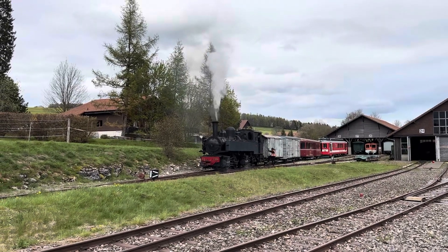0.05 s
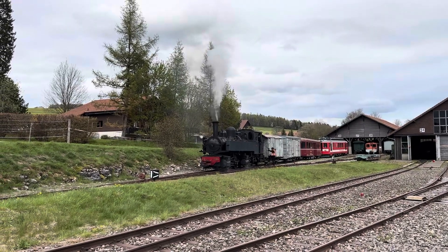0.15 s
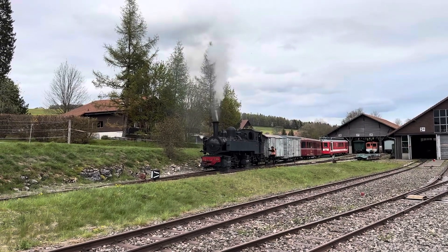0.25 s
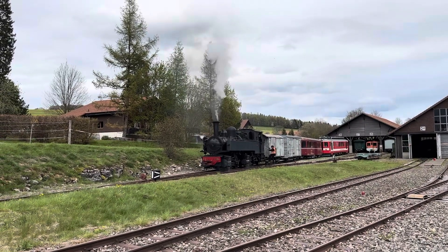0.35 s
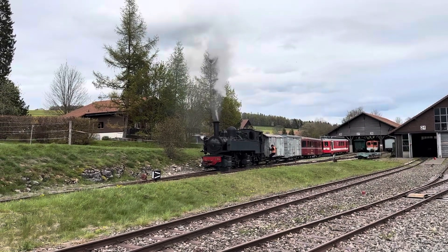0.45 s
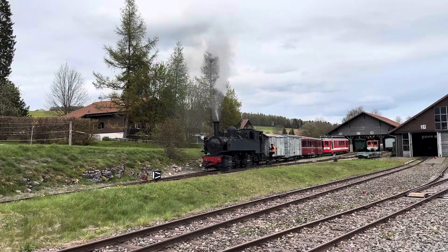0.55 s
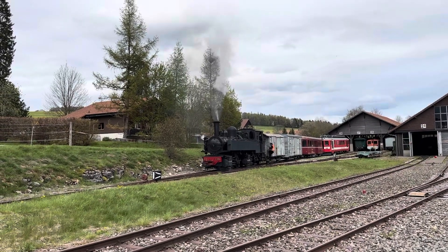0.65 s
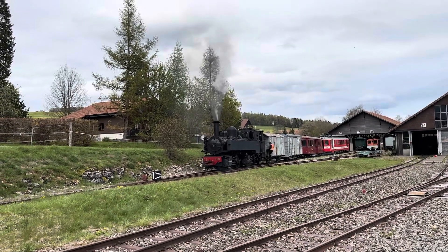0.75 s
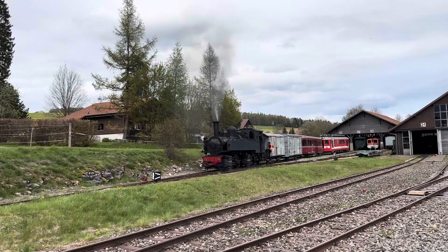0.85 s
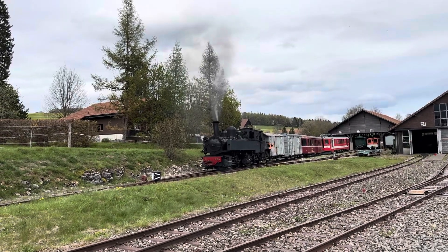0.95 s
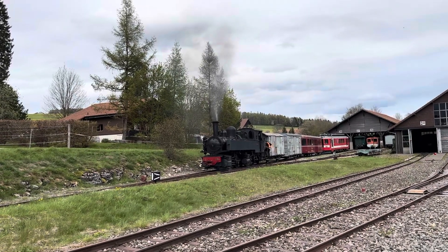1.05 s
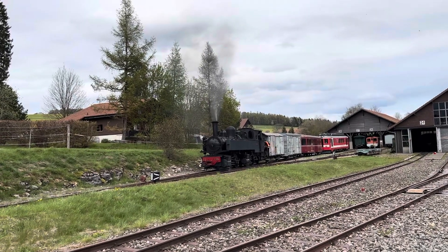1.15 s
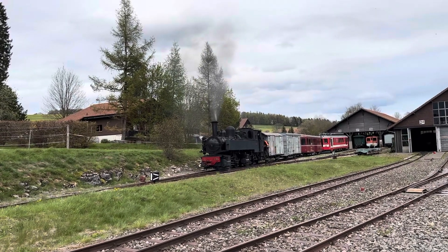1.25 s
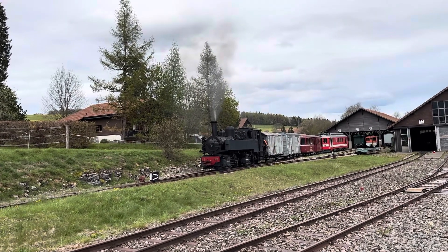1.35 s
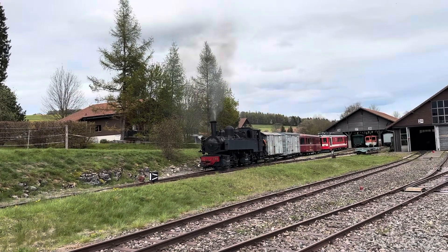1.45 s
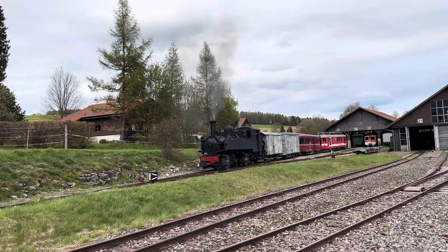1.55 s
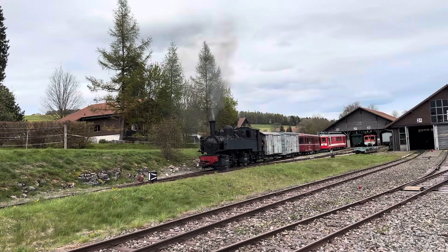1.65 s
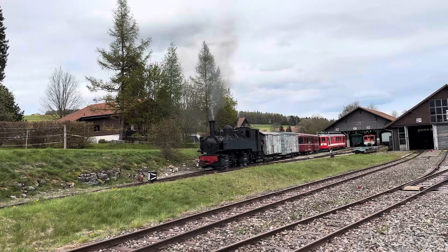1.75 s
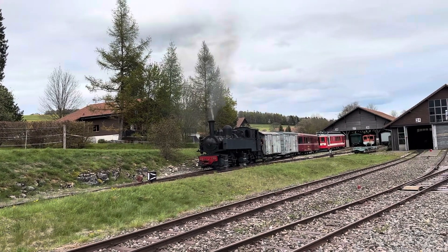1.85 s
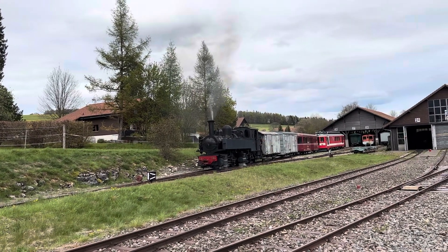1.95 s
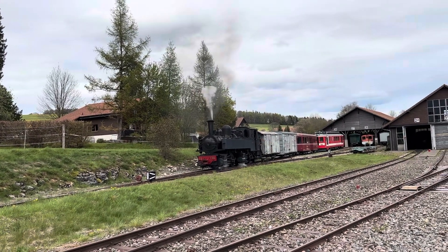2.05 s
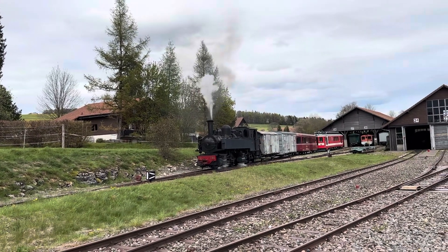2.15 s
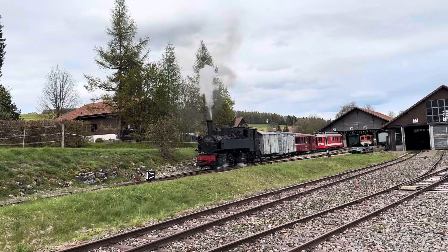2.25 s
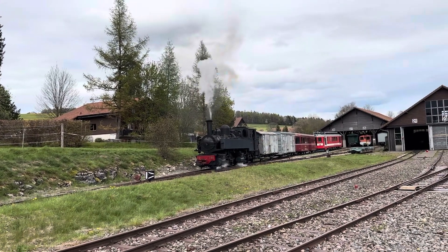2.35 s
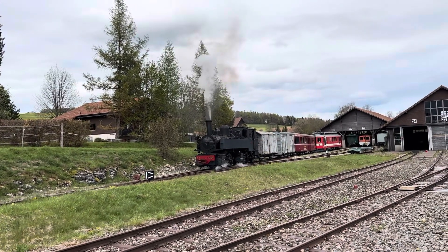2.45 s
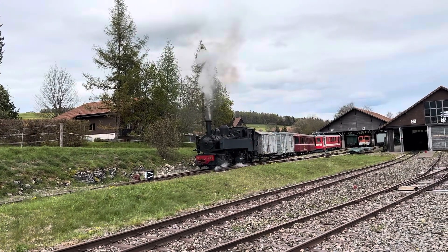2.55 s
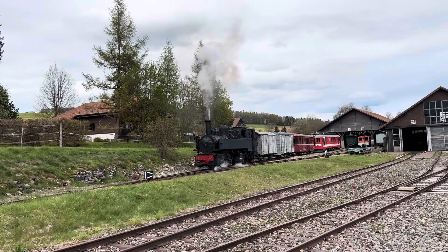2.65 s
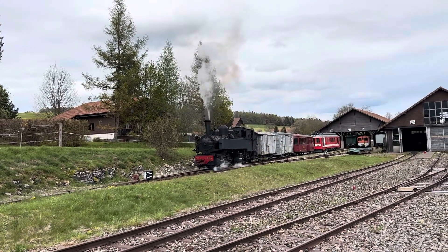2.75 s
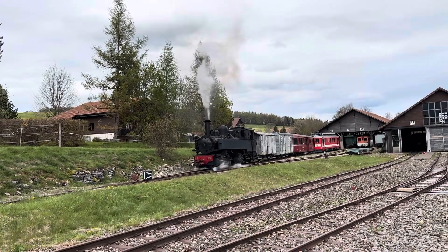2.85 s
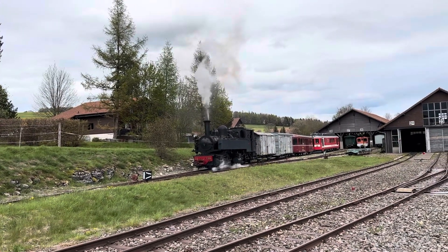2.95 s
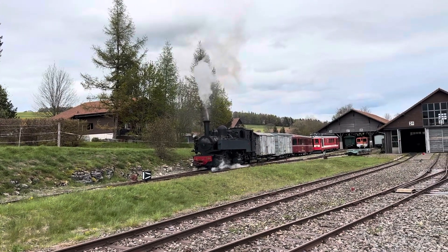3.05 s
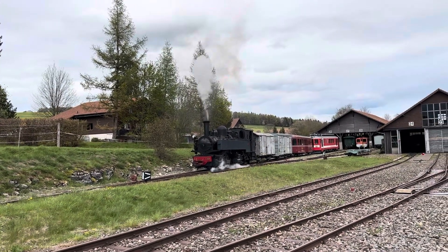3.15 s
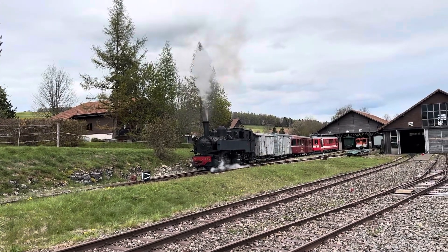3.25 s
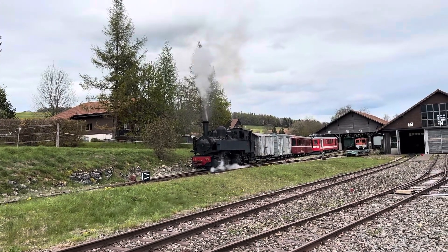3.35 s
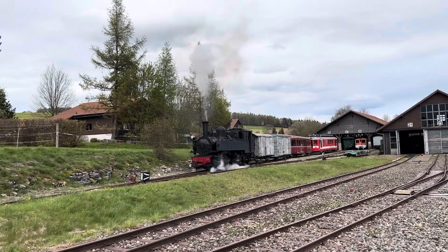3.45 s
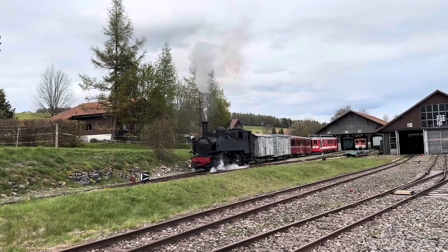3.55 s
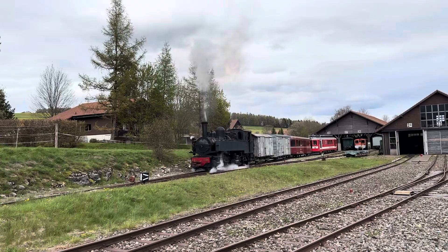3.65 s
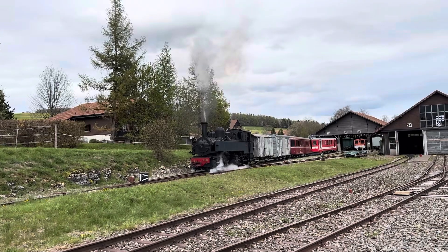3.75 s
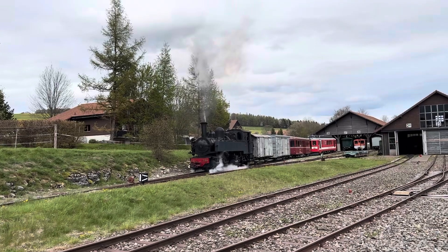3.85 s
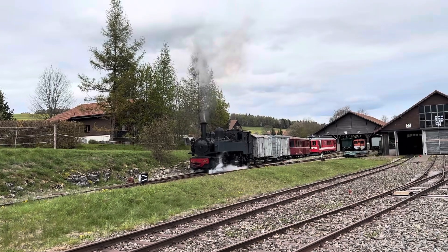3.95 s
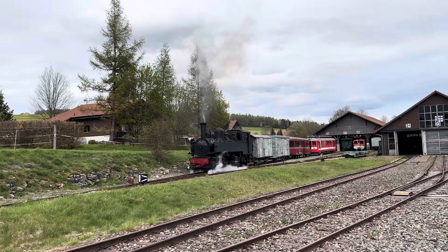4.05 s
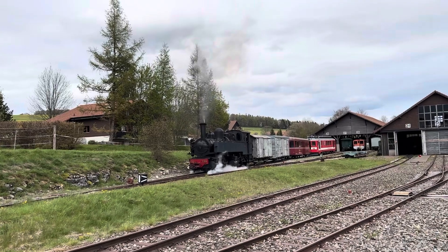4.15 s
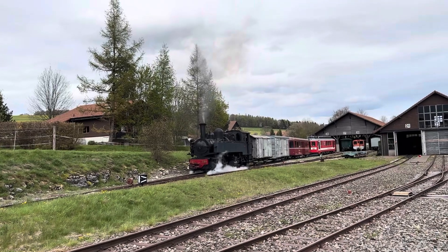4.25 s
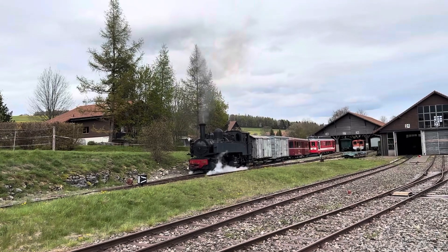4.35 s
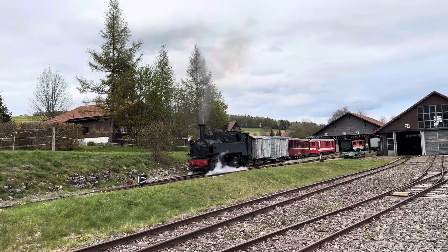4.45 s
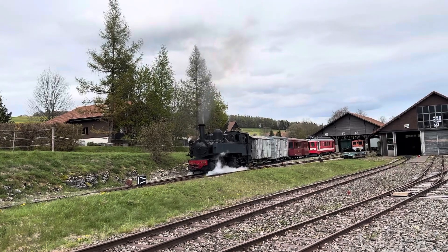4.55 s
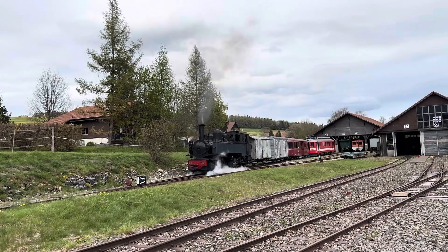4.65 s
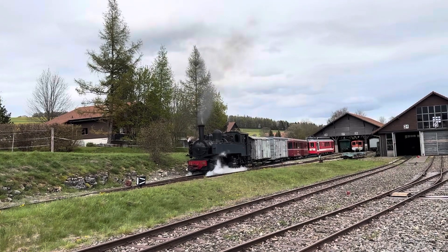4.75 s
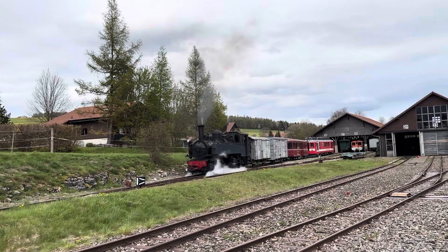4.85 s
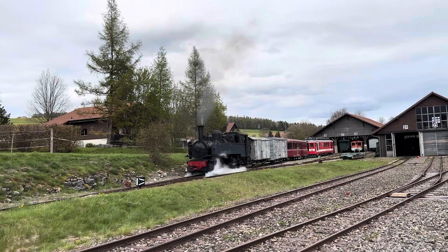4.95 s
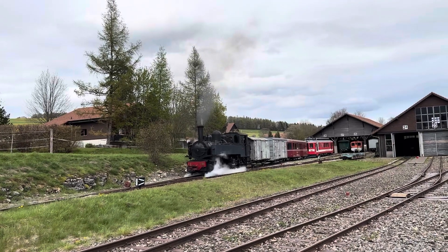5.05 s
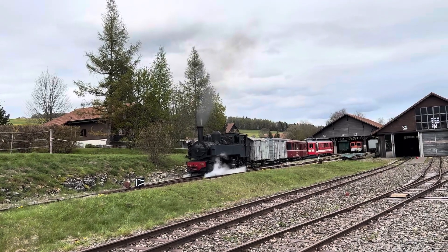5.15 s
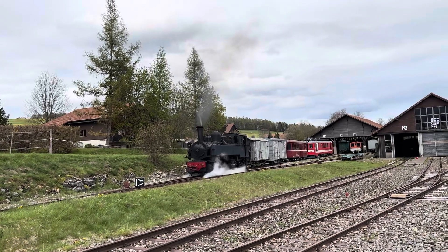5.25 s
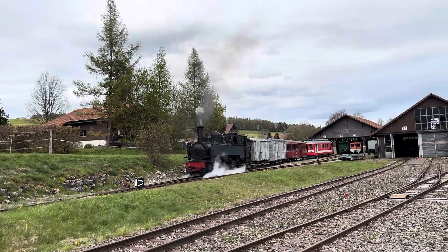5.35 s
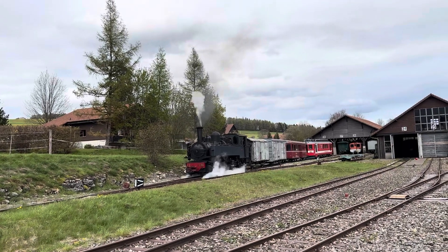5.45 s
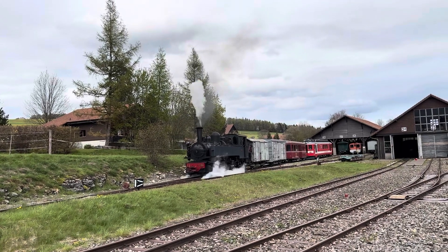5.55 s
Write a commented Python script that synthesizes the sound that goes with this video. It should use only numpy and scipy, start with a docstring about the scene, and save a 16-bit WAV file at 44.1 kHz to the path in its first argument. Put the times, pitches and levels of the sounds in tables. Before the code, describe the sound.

A small steam engine stands some forty metres away in an open country yard. An old chuff fades over a steady boiler simmer and a fine high jet. Leaking steam grows, with a chuff near two seconds and a close pair before three. Then drain cocks cough open into a loud hiss with thin high whistles, and a last chuff sounds. Low wind bumps the camera microphone.

```python
"""A small steam locomotive pulls away at a country depot, some forty metres from a camera's two microphone ports.
First the boiler simmers as an earlier chuff dies away with a last hiss, and a fine jet swells and is shut off.
Then the piston glands begin to leak, and uneven chuffs leave the chimney, each with a short falling hoot.
Near four seconds the drain cocks open: a cough, a loud drying hiss and thin whistles, then a last chuff.
All along, the yard answers the chuffs and a breeze bumps the microphone; two dry ticks come early on."""
import sys
import numpy as np
from scipy import signal
from scipy.fft import rfft, irfft, next_fast_len
from scipy.io import wavfile
from scipy.ndimage import uniform_filter1d, map_coordinates

SR = 44100
rng = np.random.default_rng(int(sys.argv[2]) if len(sys.argv) > 2 else 0)


def log_audio(samples):
    """Write samples as a 16-bit WAV file to the path given in sys.argv[1]."""
    # one column per channel
    frames = np.atleast_2d(samples).T
    # limit to full scale, then quantise
    limited = np.clip(frames, -1, 1)
    pcm = np.round(limited * 32767).astype(np.int16)
    wavfile.write(sys.argv[1], SR, pcm)


N = 247401


# Exhaust beats at the chimney. Each row: start in seconds, blast level in dB, rise in seconds, time from
# start to fall in seconds, fall in dB per second, hoot level in dB, hoot rise in seconds,
# time for the hoot's pitch to settle in seconds.
CHUFFS = [(-.25, -30, .03, 0.048, 63.5, -24, 0.045, .02), (1.981, -28.5, 0.068, .09, 55, -25, .075, 0.028),
          (2.696, -25.5, 0.059, .076, 250, -25.5, 0.12, .04),
          (2.850, -31.5, 0.026, 0.086, 89, -40.5, .02, 0.0184),
          (5.381, -28.5, 0.036, 0.085, 41, -21, 0.032, 0.012)]
# Colour of the blast. Each row: frequency in Hz, relative level in dB per Hz.
BLAST_SPECTRUM = [(90, -13), (180, -15.5), (300, -7), (500, -8.5), (730, -5), (950, -6), (1400, 1),
                  (1750, -6.5), (2100, -2.5), (2700, -8), (4300, -4.5), (6000, -13.5), (8300, -14),
                  (13500, -29.5)]
# Hollow body of the chimney. Each row: frequency in Hz, relative level in dB per Hz.
STACK_SPECTRUM = [(120, -11), (200, -4), (300, -3), (500, -2.5), (700, -4), (900, -4), (1300, -21),
                  (3000, -60)]
HOOT_HZ, HOOT_SCOOP_HZ = 1185, 70  # the first crack of steam overblows each hoot by the scoop
HOOT_SAG_HZ_PER_S, HOOT_SAG_S = 560, 0.2  # the pitch sags at this rate, for this long
# Roughness (0-1) of a hoot as loud as its blast; a relatively stronger hoot is rougher.
HOOT_ROUGH, HOOT_ROUGHENS_PER_DB = 0.468, 0.26
STACK_DB = -44.0


def chimney():
    """Each beat is a blast of steam that fills the stack; the blast pipe hoots and sags as the pressure falls."""
    roar, body, hoots = np.zeros((3, N))
    for start, db, rise, hold, fall_db, hoot_db, hoot_rise, settle in CHUFFS:
        age = clock() - start
        roar += amp(db) * puff(age, rise, hold, fall_db)
        # the stack fills and empties later
        body += amp(STACK_DB) * puff(age - 0.008, 0.94 * rise, 1.54 * hold, 1.8 * fall_db)

        sag = HOOT_SAG_HZ_PER_S * np.clip(age, 0, HOOT_SAG_S)
        scoop = HOOT_SCOOP_HZ * np.exp(-np.clip(age / settle, 0, 10) ** 2)
        rough = np.clip(HOOT_ROUGH + HOOT_ROUGHENS_PER_DB * (hoot_db - db), 0, 1)
        tone = edge_tone(HOOT_HZ - sag + scoop, waver=0.0015 + 0.014 * rough, waver_rate=170,
                         flutter_db=1.0 + 2.0 * rough, flutter_rate=70)
        crack = 0.48 * puff(age - 0.002, 0.0066, 0.0099, 1200)  # the valve's first crack of steam
        swell = puff(age, hoot_rise, 0.88 * hold, fall_db + 80)
        hoots += amp(hoot_db) * np.maximum(crack, swell) * tone

    blast = roar * amp(0.63 * wobble(60)) * rush(BLAST_SPECTRUM, patchy_db=1.0)
    blast += body * rush(STACK_SPECTRUM, patchy_db=5.5)
    return scattered(blast, share=0.082, spread=0.026, count=8) + hoots


# Water leaving the cocks. Each row: frequency in Hz, relative level in dB per Hz.
GULP_SPECTRUM = [(150, -24), (260, -25), (330, 6), (430, -12), (850, -0.5), (1150, -26), (3000, -48.5)]
# Wet steam at first. Each row: frequency in Hz, relative level in dB per Hz.
SPRAY_SPECTRUM = [(110, -43), (220, -18.5), (330, -13), (500, -13), (850, -13.5), (1100, -1.5),
                  (1350, -1.3), (1800, -1.3), (2200, -5), (3300, -4.5), (4800, -5.5), (6000, -13),
                  (8400, -6), (9500, -2.5), (11000, -19), (13500, -22)]
# Dry steam afterwards. Each row: frequency in Hz, relative level in dB per Hz.
DRY_STEAM_SPECTRUM = [(150, -34), (300, -14), (700, -14.5), (1000, -8), (1350, -4), (1600, -3.5),
                      (2400, 2.5), (3400, -0.5), (4800, -8.5), (6000, -13.5), (7500, -12.5), (8800, -6.5),
                      (10500, -32), (13500, -24)]
COCKS_OPEN_S, COCKS_RISE_S = 3.878, 0.011  # the cocks are half open; time constant of the opening
COCKS_DB, SURGE_DB, SURGE_S = -31, 7, 0.47  # settled hiss, first surge above it, how long the surge lasts
DRY_AFTER_S, DRYING_S = 0.47, 0.13  # half dry this long after opening; time constant of the drying
PIPE_TONE_HZ, PIPE_TONE_DB = 1328, -15  # the drain pipes sing unsteadily; dB relative to their hiss


def cylinders():
    """The cocks cough up water, then a surge of spray that dries to an even hiss while the pipes sing."""
    age = clock() - COCKS_OPEN_S
    db = COCKS_DB + SURGE_DB * np.exp(-(age / SURGE_S) ** 2)
    dry = ease(age - DRY_AFTER_S, DRYING_S)
    cough = amp(-36.0) * puff(age + 0.015, 0.037, 0.044, 134) * rush(GULP_SPECTRUM, patchy_db=-0.5)
    wet_hiss = np.sqrt(1 - dry) * rush(SPRAY_SPECTRUM, patchy_db=1.64)
    dry_hiss = np.sqrt(dry) * rush(DRY_STEAM_SPECTRUM, patchy_db=2.0)
    singing = edge_tone(PIPE_TONE_HZ, waver=0.018, waver_rate=120, flutter_db=4.0, flutter_rate=35)
    jet = wet_hiss + dry_hiss + amp(PIPE_TONE_DB) * singing
    return cough + ease(age, COCKS_RISE_S) * amp(db + 0.35 * wobble(18)) * jet


# Whistles at the edges of the cocks. Each row: start in seconds, rise in seconds, time from start to
# release in seconds, pitch in Hz, how sharp it starts in Hz, level in dB.
WHISTLES = [(4.015, 0.025, .07, 8350, 260, -31), (4.081, 0.028, 0.054, 8310, 31, -26),
            (4.139, .035, 0.057, 8250, 70.5, -26), (4.2, .01, 0.044, 7170, 92.5, -22),
            (4.275, .03, .065, 7200, 1, -32.5), (4.358, .012, 0.034, 7250, 1, -28),
            (4.375, 0.032, 0.092, 8320, 111, -32.5), (4.508, 0.033, 0.14, 8270, 20, -31),
            (4.66, 0.0092, .95, 8245, -2, -33.5)]
WHISTLE_SETTLE_S, WHISTLE_RELEASE_DB_PER_S = 0.04, 450
WHISTLE_SAG_HZ_PER_S, WHISTLE_FADE_DB_PER_S = 160, 6  # each sinks and fades with the pressure
WHISTLE_WAVER = 0.00316  # unsteadiness of pitch, as a share


def whistles():
    """The jets sing at the edges of the cocks and jump between pitches; each note sinks and fades."""
    notes = np.zeros(N)
    drift = 1 + WHISTLE_WAVER * wobble(420)
    for start, rise, length, hz, sharp_hz, db in WHISTLES:
        age = np.maximum(clock() - start, 0)
        blowing = amp(db - WHISTLE_FADE_DB_PER_S * age) * puff(age, rise, length, WHISTLE_RELEASE_DB_PER_S)
        pitch = hz + sharp_hz * np.exp(-age / WHISTLE_SETTLE_S) - WHISTLE_SAG_HZ_PER_S * age
        notes += blowing * np.sin(2 * np.pi * np.cumsum(pitch * drift) / SR)
    return notes * unit(amp(3.6 * wobble(60)))


# Steam past the piston glands as pressure builds in the cylinders. Each row: time in seconds,
# level in dB before the cocks relieve it.
LEAK = [(1.42, -69), (1.5, -57), (1.6, -49.5), (1.75, -55), (2.1, -48), (2.35, -45), (2.7, -37)]
# Colour of the leak. Each row: frequency in Hz, relative level in dB per Hz.
GLAND_SPECTRUM = [(150, -23), (300, -9), (800, -10), (1350, -8), (1700, -8), (3000, -4), (4600, 0),
                  (5400, -1), (5900, -8.5), (7200, -5), (8700, 2), (9400, -9), (11000, -8), (13500, -14)]
LEAK_RELIEF_DB, LEAK_RELIEF_S = 3, 0.2  # the open cocks take pressure off the glands
LEAK_TONE_HZ, LEAK_TONE_DB = 8680, -9.5  # the leak sings faintly; dB relative to its hiss


def glands():
    """Steam leaks at the piston glands with a faint, breathy tone that stops once the cocks ease the leak."""
    relief = np.clip((clock() - COCKS_OPEN_S) / LEAK_RELIEF_S, 0, 1)
    flow = amp(curve(LEAK) - LEAK_RELIEF_DB * relief + 0.31 * wobble(8.9))
    tone = edge_tone(LEAK_TONE_HZ, waver=0.019, waver_rate=420, flutter_db=6.5, flutter_rate=66)
    return flow * (rush(GLAND_SPECTRUM, patchy_db=2.0) + amp(LEAK_TONE_DB) * (1 - relief) * tone)


# Last hiss of the earlier chuff, strongest near 1.9 kHz. Each row: frequency in Hz, relative level in dB per Hz.
LAST_HISS_SPECTRUM = [(900, -26), (1500, -5), (1850, 9), (2200, 1), (2700, -27), (4300, -17), (6000, -26)]
LAST_HISS_S, LAST_HISS_RISE_S, LAST_HISS_HOLD_S = -0.05, 0.03, 0.13
LAST_HISS_DB, LAST_HISS_FALL_DB_PER_S = -48.5, 82


def last_hiss():
    """The tail of the earlier chuff: a band of steam noise that dies away."""
    flow = puff(clock() - LAST_HISS_S, LAST_HISS_RISE_S, LAST_HISS_HOLD_S, LAST_HISS_FALL_DB_PER_S)
    return amp(LAST_HISS_DB) * flow * rush(LAST_HISS_SPECTRUM, patchy_db=1.5)


# Fire and blower. Each row: frequency in Hz, relative level in dB per Hz.
SIMMER_SPECTRUM = [(40, -14.5), (90, -11), (170, -24), (300, -5.5), (500, -8), (1080, -8.5), (1350, -4.5),
                   (1600, -7), (2050, -9), (2800, -13.5), (4100, -12.5), (5800, -20), (9800, -18),
                   (13500, -31)]
# A fine jet from a small valve. Each row: frequency in Hz, relative level in dB per Hz.
FINE_JET_SPECTRUM = [(4000, -46), (7500, -9), (9200, -3), (10200, 1), (11500, -9), (15000, -18)]
SIMMER_DB, SIMMER_DRIFT_DB = -49.2, 0.2  # the boiler's steady level and its slow drift
VALVE_OPEN_S, VALVE_RISE_S, VALVE_HOLD_S = 0.03, 0.53, 1.11  # the hold counts from the opening
VALVE_DB, VALVE_FALL_DB_PER_S = -50.5, 90


def boiler():
    """The steady simmer of fire and blower rings in the pipes; a fine jet swells and is shut off."""
    pipes = amp(-4.7 + 0.7 * wobble(8.34)) * ringing()
    level = amp(SIMMER_DB + SIMMER_DRIFT_DB * wobble(1.96) + 0.4 * wobble(9.4))
    simmer = level * (rush(SIMMER_SPECTRUM, patchy_db=1.5) + pipes)
    valve = amp(VALVE_DB) * puff(clock() - VALVE_OPEN_S, VALVE_RISE_S, VALVE_HOLD_S, VALVE_FALL_DB_PER_S)
    return simmer + valve * rush(FINE_JET_SPECTRUM, patchy_db=4.5)


# Resonances of the steam pipes. Each row: frequency in Hz, width in Hz before the response is squared,
# relative level in dB.
PIPE_MODES = [(1342, 59, 0), (1134, 54, -16), (2005, 68, -9)]


def ringing():
    """Noise of rms 1 sounding in the steam pipes, each mode a squared band-pass resonance."""
    def modes(f):
        response = 0
        for centre, width, db in PIPE_MODES:
            loss = 1j * f * width
            response = response + amp(db) * (loss / (centre ** 2 - f ** 2 + loss)) ** 2
        return response
    return unit(filtered(rng.standard_normal(N), modes))


# Small dry ticks. Each row: start in seconds, level of the main partial in dB, its frequency in Hz.
TICKS = [(.170, -25.5, 1730), (0.957, -29.5, 1260)]


def ticks():
    """Brief dry ticks with almost no ring: two partials and a little noise."""
    out = np.zeros(N)
    for start, db, hz in TICKS:
        age = np.maximum(clock() - start, 0)
        ring = np.sin(2 * np.pi * hz * age) + 0.3 * np.sin(2 * np.pi * 0.46 * hz * age)
        ring += 0.15 * rng.standard_normal(N)
        out += amp(db) * puff(age, 0.00055, 0.00093, 9000) * ring
    return out


def scattered(x, share, spread, count):
    """Ground, rails and the engine's own flanks add weak late copies that comb the spectrum."""
    paths = np.zeros((2, SR // 10))
    for when, sign, skew in rng.random((count, 3)):
        lag = int(min(0.007 + when * spread, 0.09) * SR)
        right_lag = lag + int(8 * skew)
        paths[[0, 1], [lag, right_lag]] += share * np.sign(sign - 0.5) / np.sqrt(count)
    paths[:, 0] = 1  # direct sound
    return signal.fftconvolve(x, paths, axes=1)[:, :N] / np.sqrt(1 + share ** 2)


# Answers of the bank, sheds and trees. Each row: delay in seconds, level in dB before the dulling.
ECHOES = [(0.056, -19), (.14, -27), (.29, -18), (.53, -22)]
# Decay of the diffuse tail. Each row: frequency in Hz, time to fall 60 dB in seconds.
TAIL_DECAY = [(200, 0.15), (1200, 2.6), (4000, 0.68), (10000, 0.17)]


def yard(x, tail_db):
    """Dull echoes from the bank and sheds, and a diffuse tail from the trees."""
    def reflections(hz):
        arrivals = sum(amp(db) * np.exp(-2j * np.pi * hz * delay) for delay, db in ECHOES)
        return arrivals / (1 + (hz / 3200) ** 2)  # duller towards the treble
    hz, t, z = signal.stft(rng.standard_normal((2, SR)), SR, nperseg=256)
    decay = amp(-60 * t / along(TAIL_DECAY, hz)[:, None])
    tail = signal.istft(z * decay, SR, nperseg=256)[1]
    trees = signal.fftconvolve(x, tail / np.linalg.norm(tail[0]), axes=1)[:, :N]
    return filtered(x, reflections) + amp(tail_db) * trees


# The hardest eddies at the microphone. Each row: time of the peak in seconds, level in dB,
# half length in seconds, pitch at the peak in Hz.
EDDIES = [(.034, -36, .005, 103), (.087, -40, 0.0093, 90.3), (.126, -38, 0.0048, 149.7),
          (.151, -38.5, 0.0071, 75), (.19, -40.5, 0.007, 90), (.223, -37, 0.0055, 133.4),
          (.246, -31.5, 0.008, 58), (.312, -32, 0.0044, 95.6), (1.479, -40, 0.012, 73.4),
          (1.742, -41, .009, 135.4), (1.764, -35.5, 0.0066, 87.4), (1.855, -40, .007, 70),
          (1.878, -42, .007, 95), (1.924, -36.5, 0.0084, 88.6), (2.245, -40, 0.0076, 130.7),
          (2.755, -34.5, .012, 115.3), (2.894, -34.5, 0.0041, 119.5), (2.965, -41, 0.011, 69.7),
          (3.577, -31.5, .0075, 100), (4.239, -35, 0.0055, 140), (4.262, -40, .008, 80),
          (4.295, -40, .009, 70.4), (4.42, -40, 0.0063, 123.6), (4.44, -33.5, 0.0058, 84.4),
          (4.516, -38, 0.0058, 85.4), (4.622, -38, 0.0144, 114), (4.705, -38, 0.0088, 96),
          (4.733, -29, 0.0067, 84.2), (4.847, -28.5, 0.0025, 149), (4.937, -39, 0.0057, 64.5),
          (5.135, -36.5, 0.011, 86.7), (5.249, -29.5, 0.0035, 165), (5.287, -37.5, .011, 110),
          (5.32, -40, 0.01, 59), (5.392, -34, 0.0063, 74), (5.411, -27.5, .0045, 140),
          (5.535, -38, 0.007, 74), (5.57, -41, .012, 59.6)]
# Turbulent core of a hard eddy. Each row: frequency in Hz, relative level in dB per Hz.
FLAP_SPECTRUM = [(18, -50), (30, -29), (70, -5.5), (140, -2), (220, -6.5), (330, -28), (700, -61)]
THUMP_SAG = 0.3014  # share by which the pitch starts above and ends below its value at the peak
THUMP_PORT_RAD, THUMP_GRIT_DB = 0.58, -7.5  # largest phase shift of each port; turbulence in a thump


def thumps():
    """A hard eddy shoves the air at the ports to and fro, slowing as it passes."""
    out, grit = np.zeros((2, N)), np.zeros(N)
    t = clock()
    for (peak, db, half_length, hz), (turn, skew) in zip(EDDIES, rng.random((len(EDDIES), 2))):
        near = slice(max(int((peak - 0.08) * SR), 0), int((peak + 0.08) * SR))
        age = t[near] - peak
        swell = amp(db) / np.cosh(age / half_length)
        pitch = hz * (1 - THUMP_SAG * np.tanh(age / (2 * half_length)))
        port_shift = THUMP_PORT_RAD * (2 * skew - 1) * np.array([[1], [-1]])
        phase = 2 * np.pi * (turn + np.cumsum(pitch) / SR) + port_shift
        out[:, near] += np.sqrt(2) * swell * np.sin(phase)
        grit[near] += swell
    return out + amp(THUMP_GRIT_DB) * grit * swirl(FLAP_SPECTRUM)


# Strength of the breeze at the microphone. Each row: time in seconds, level in dB.
WIND = [(0, -42.5), (.27, -41), (.38, -58), (1.35, -65.5), (1.9, -46.5), (2.25, -49.5), (2.42, -58),
        (2.9, -47.5), (3.8, -55.5), (4.3, -45.5), (5.0, -49), (5.6, -47)]
# Small eddies at the ports. Each row: frequency in Hz, relative level in dB per Hz.
BUFFET_SPECTRUM = [(18, -46), (35, -13), (60, 2.5), (110, -2.5), (170, -4.5), (240, -17), (400, -28),
                   (1000, -71)]
# Smooth rumble of the air. Each row: frequency in Hz, relative level in dB per Hz.
RUMBLE_SPECTRUM = [(18, -40), (35, -4), (60, -3.5), (90, -15), (130, -13), (200, -33), (500, -68)]
CALM_DB = -3  # smooth rumble, relative to the breeze
SMALL_EDDIES_PER_S, SMALL_EDDY_S = 11, 0.024  # one at a random moment of each slot; half length of one
EDDY_SCATTER_DB = 2.5  # each is up to this much stronger or weaker


def breeze():
    """Small eddies ruffle the microphone over a faint rumble; both follow the strength of the wind."""
    late, size = rng.random((int(SMALL_EDDIES_PER_S * N / SR), 2)).T
    when = (np.arange(len(late)) + late) / SMALL_EDDIES_PER_S
    eddy_power = amp(2 * EDDY_SCATTER_DB * (2 * size - 1))
    power = np.bincount((when * SR).astype(int), eddy_power, N)[:N]
    passing = np.exp(-(np.arange(-SR // 10, SR // 10) / SR / SMALL_EDDY_S) ** 2)
    small = np.sqrt(np.abs(signal.fftconvolve(power, passing, mode="same")))
    rumble = amp(CALM_DB) * rush(RUMBLE_SPECTRUM, patchy_db=1.5)
    return amp(curve(WIND)) * (small * swirl(BUFFET_SPECTRUM) + rumble)


def swirl(spectrum):
    """Air of nearly even strength at the microphone; each port also feels its own turbulence."""
    own = 0.18 * rush(spectrum, patchy_db=-1.0) * [[1], [-1]]
    air = unit(rush(spectrum, patchy_db=0.3) + own)
    local_power = uniform_filter1d(np.mean(air ** 2, axis=0), size=700)
    return air / np.sqrt(np.abs(local_power) + 0.035)


# Likeness of noise at the two ports. Each row: frequency in Hz, correlation from 0 to 1.
ALIKE = [(100, 0.73), (600, 0.99), (1400, 0.94), (2500, 0.62), (4000, 0.79), (5600, 0.73), (7000, 1),
         (9800, 1), (13000, 0.28)]


def rush(spectrum, patchy_db):
    """Turbulent stereo noise of rms 1, with patches of random gain in time and frequency."""
    z = signal.stft(rng.standard_normal((2, N)), nperseg=1024)[2]
    field = uniform_filter1d(rng.standard_normal(z.shape[1:]), size=4, axis=0)
    field = uniform_filter1d(field, size=10, axis=1)
    pair = signal.istft(z * amp(patchy_db * unit(field)), nperseg=1024)[1][:, :N]

    def mid_side(hz):
        turn = np.arccos(np.clip(along(ALIKE, hz), 0, 1)) / 2
        return amp(along(spectrum, hz)) * [np.cos(turn), np.sin(turn)]
    mid, side = filtered(pair, mid_side)
    return unit(np.array([mid + side, mid - side]))


def edge_tone(hz, waver, waver_rate, flutter_db, flutter_rate):
    """A tone of rms 1 blown by a jet; turbulence shakes its pitch and strength."""
    phase = 2 * np.pi * np.cumsum(hz * (1 + waver * wobble(waver_rate))) / SR
    return unit(np.sin(phase) * amp(flutter_db * wobble(flutter_rate)))


def puff(age, rise, hold, fall_db):
    """A port opens, stays open, and the pressure behind it drains away."""
    opening = np.sin(np.pi / 2 * np.clip(age / rise, 0, 1))
    return opening * amp(-fall_db * np.maximum(age - hold, 0))


def ease(age, time):
    """A smooth step from 0 to 1, halfway at age 0."""
    return 0.5 + 0.5 * np.tanh(age / (2 * time))


def amp(db):
    """Decibels to gain."""
    return 10 ** (np.asarray(db) / 20)


def unit(x):
    """Scaled to rms 1."""
    return x / np.sqrt(np.mean(x ** 2) + 1e-20)


def along(points, hz):
    """(Hz, value) points read on a log axis."""
    f, v = np.transpose(points)
    return np.interp(np.log(hz + 1), np.log(f + 1), v)


def clock():
    """The time of every sample, in seconds."""
    return np.arange(N) / SR


def curve(rows):
    """(seconds, value) rows read at every sample."""
    s, v = np.transpose(rows)
    return np.interp(clock(), s, v)


def wobble(rate):
    """A smooth random curve, rate knots a second."""
    return map_coordinates(rng.standard_normal(int(N * rate / SR) + 4), [clock() * rate])


def filtered(x, response):
    """x times a complex response of frequency."""
    m = next_fast_len(N + SR // 2)
    return irfft(rfft(x, m) * response(np.fft.rfftfreq(m, 1 / SR)), m)[..., :N]


def scene():
    """The engine in its yard, and the air at the microphone."""
    beats = chimney()
    jets = cylinders() + glands() + last_hiss() + boiler()
    steam = scattered(jets, share=0.31, spread=0.03, count=14)
    engine = beats + steam + whistles() + ticks()
    return engine + yard(beats, tail_db=-18.5) + thumps() + breeze()


# Phase between the microphone ports. Each row: frequency in Hz, lead of the left in radians.
LEAD = [(600, 0.1), (1150, 0.93), (2200, 0.15), (3200, -1.33), (4900, -0.33), (5700, 1.73), (6200, 0.05),
        (7800, 0.27), (9100, 2.85), (10300, 3.32), (11700, 6.2), (13000, 6.29), (13900, 9.29)]
# Level between the microphone ports. Each row: frequency in Hz, left minus right in dB.
TILT = [(100, 0), (400, -2.5), (1200, -4.5), (1900, -3), (2400, 2.5), (3000, -2.5), (3800, -4.5),
        (4700, -1), (5600, -0.5), (14000, -0.5)]
MIC_LOW_CUT_HZ, TOP_HZ = 35, 14400


def record(dry):
    """The camera body shades and delays its two ports differently; deep bass is cut, as is all above the top."""
    sides = np.array([[0.5], [-0.5]])  # left, right

    def microphone(hz):
        ports = amp(sides * along(TILT, hz)) * np.exp(1j * sides * along(LEAD, hz))
        low_cut = hz ** 4 / np.sqrt(hz ** 8 + MIC_LOW_CUT_HZ ** 8)
        return ports * low_cut * (hz < TOP_HZ)
    return filtered(dry, microphone)


dry = scene()
out = record(dry)
log_audio(out)
```